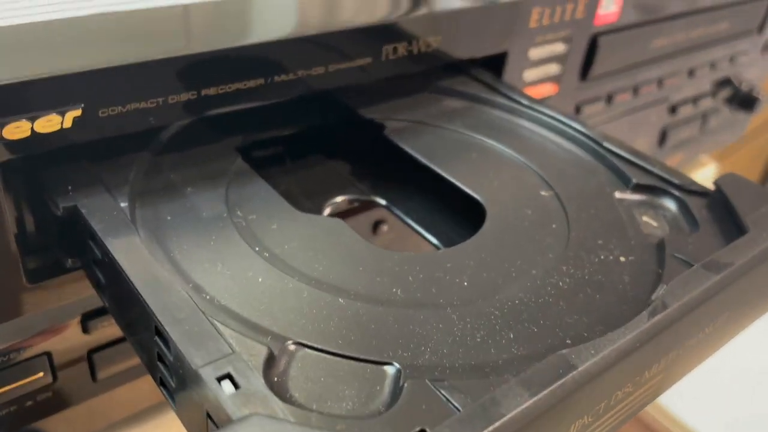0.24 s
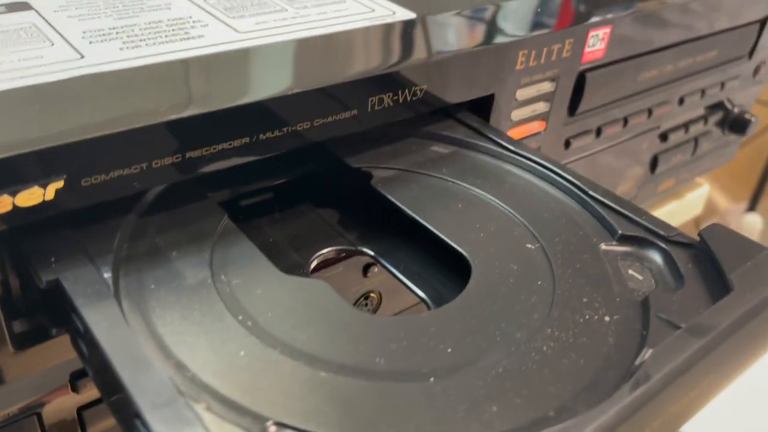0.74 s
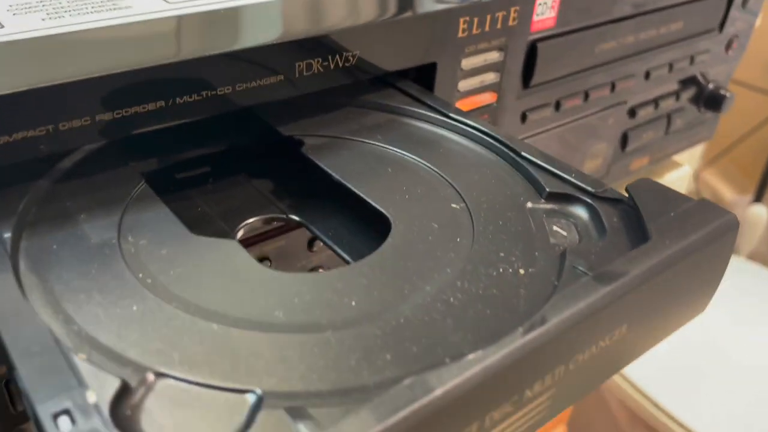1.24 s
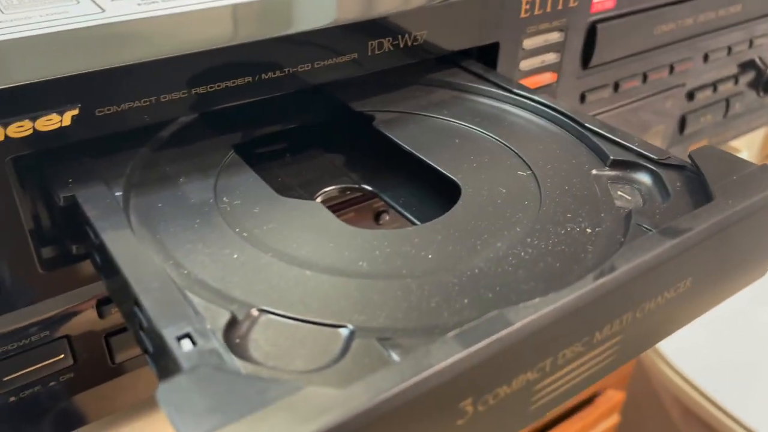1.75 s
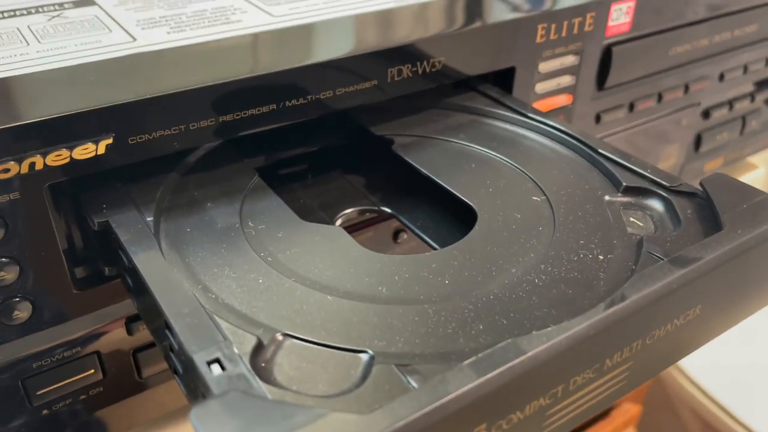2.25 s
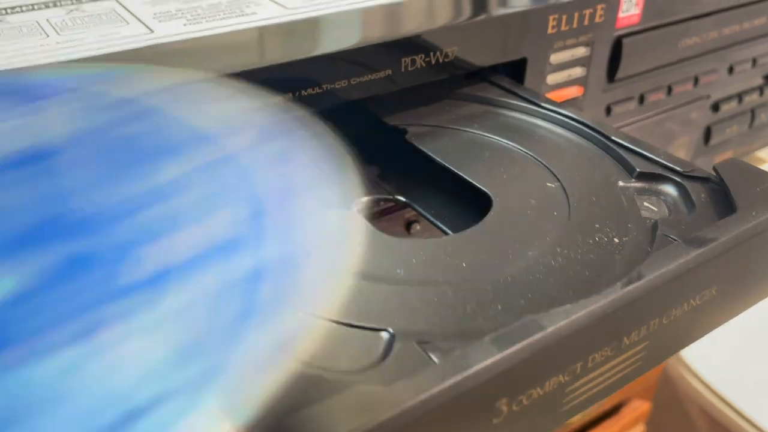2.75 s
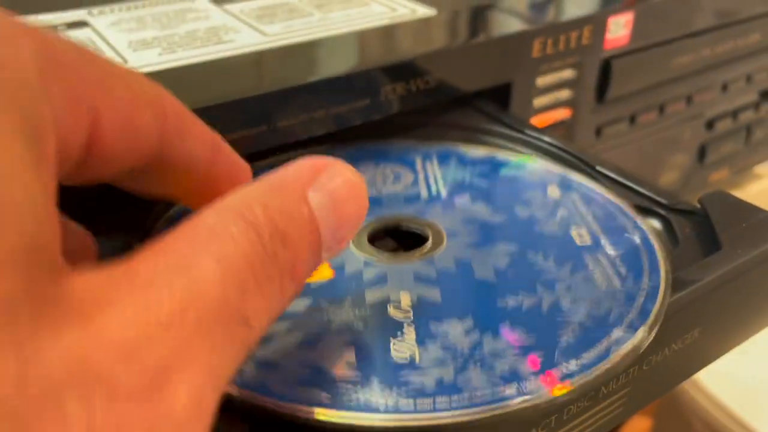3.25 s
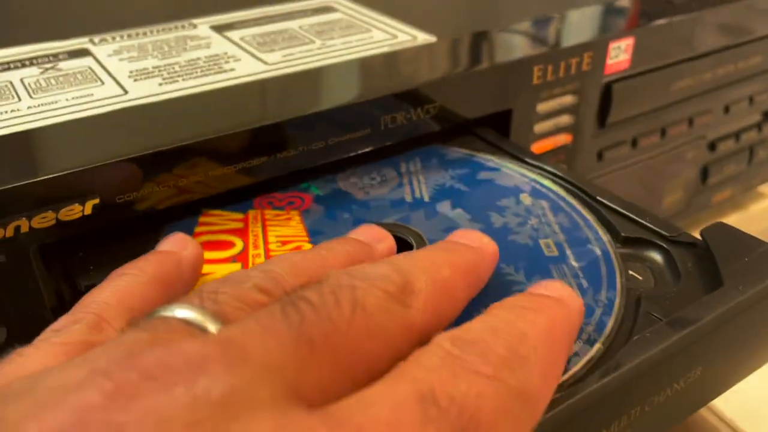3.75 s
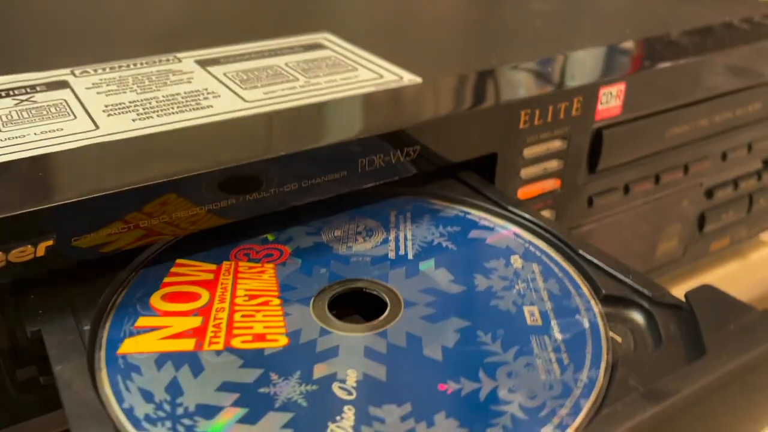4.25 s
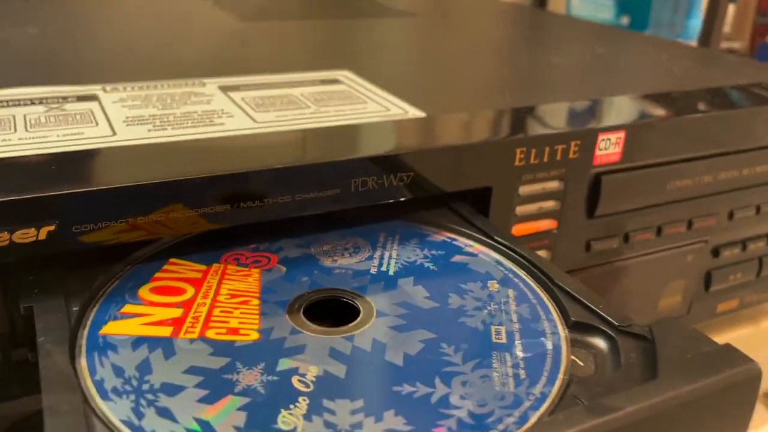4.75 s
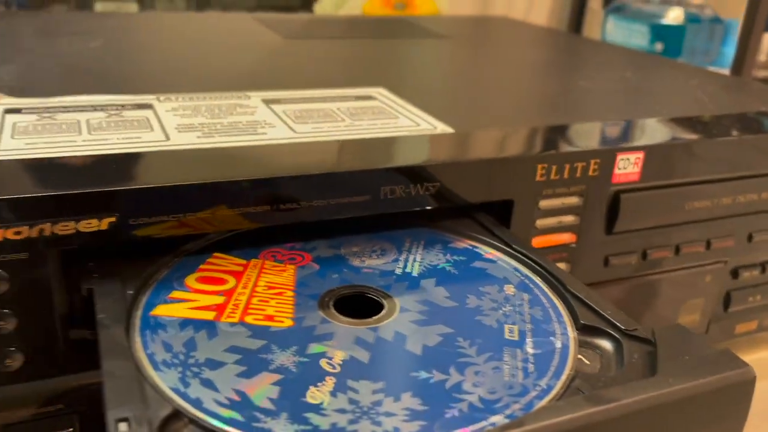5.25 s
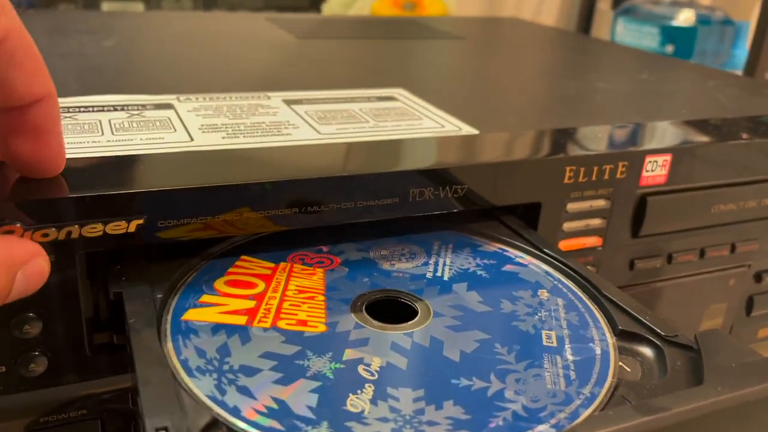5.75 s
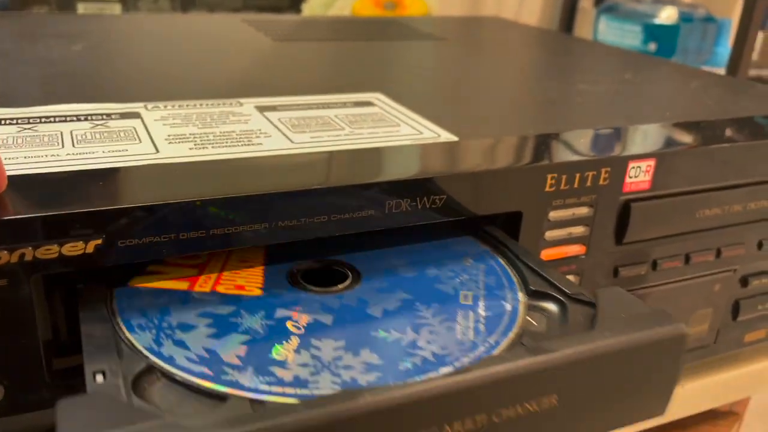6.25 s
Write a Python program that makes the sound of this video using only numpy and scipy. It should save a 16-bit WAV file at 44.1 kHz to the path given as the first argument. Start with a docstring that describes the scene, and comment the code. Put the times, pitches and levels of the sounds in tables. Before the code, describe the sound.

A low ventilation hum fills a small room throughout. In the first half second, hands rustle softly with a few light ticks, and another faint rub comes just after 1 second. At about 3 seconds a plastic disc lands in a disc changer's open tray with a sharp clack. It slides and knocks into its seat until about 4 seconds, a quick, irregular run of close plastic clicks and scrapes with soft low thuds from the cabinet, the loudest part. At 5 seconds come a few sharp, closely spaced taps on the housing, each dropping quickly in pitch, then a light rub and a dull bump around 5.4 seconds. A button clicks near 5.9 seconds, and the motor immediately starts rolling the tray in, with a quiet whir and ticking gears until the end at about 6.5 seconds.

```python
"""A disc changer is loaded over the low hum of a small room. First, hands rustle and tick by friction and
light impact. Near 3 s a plastic disc is laid in the open tray and knocks and slides into its seat, exciting
the resonances of disc, tray and cabinet. At 5 s come sharp taps on the recorder's housing, each falling
quickly in pitch. A finger clicks the button, and from 5.9 s the motor starts to roll the tray in on its
toothed rack, the gears ticking."""
import sys
import numpy as np
from scipy import signal
from scipy.fft import rfft, irfft, next_fast_len
from scipy.io import wavfile
from scipy.ndimage import uniform_filter1d, map_coordinates

SR = 44100
rng = np.random.default_rng(int(sys.argv[2]) if len(sys.argv) > 2 else 0)


def store_wav(level_fs):
    """Save 16-bit WAV to argv[1]."""
    pcm = np.round(np.clip(np.atleast_2d(level_fs), -1, 1) * 32767)
    wavfile.write(sys.argv[1], SR, pcm.T.astype(np.int16))


N = 286650

# Ventilation noise. Each row: frequency in Hz, relative density in dB.
AIR_SPECTRUM = [(12, -63), (25, -30.5), (58, 2.5), (95, -3), (140, -10.5), (222, -14.5), (319, -17),
                (410, -16), (620, -16), (1260, -27), (2320, -31.5), (2800, -40.5), (3400, -45), (6000, -57),
                (10000, -63), (16000, -70.5)]
# Drones in the hum. Each row: centre in Hz, width in Hz, rms level in dB before the drift.
DRONES = [(60.66, 8, -63), (116.54, 4.4, -56), (157.6, 8.9, -67), (253.3, 24, -56.5), (367, 44, -66.5),
          (412, 65, -62.5), (892, 12.33, -71), (1320, 110, -70.5), (2380, 350, -80)]
# Drift of the hum. Each row: time in seconds, gain in dB.
HUM_DRIFT = [(0, 2), (.6, -1), (2.6, -0.5), (3.6, 2), (4.2, 1), (5.8, 1), (6.5, 2)]
# Likeness of left and right in the room. Each row: frequency in Hz, coherence from 0 to 1.
COHERENCE = [(60, 0.9), (150, 0.92), (400, 0.74), (950, 0.046), (2400, 0.6), (6000, 0.15), (7000, 0.39),
             (15000, 0.81)]
# Room decay. Each row: frequency in Hz, reverberation time in seconds.
ROOM_T60 = [(200, 0.56), (1500, 0.15), (5000, 0.11), (12000, 0.0395)]
# Strokes of skin and cloth. Each row: start in seconds, hiss and dull levels in dB, rise and hold in seconds.
RUBS = [(0.024, -73.5, -64, .006, 0.068), (0.143, -60, -70, 0.0076, 0.071),
        (0.234, -50.5, -52.5, .006, 0.073), (0.411, -61.5, -62, 0.0071, 0.025),
        (1.172, -63.5, -59, 0.0034, 0.016), (1.923, -79.5, -74, .006, 0.028),
        (4.619, -66.5, -67, .004, 0.0084), (4.652, -87, -65, 0.0065, 0.079), (5.003, -61, -61, .008, 0.05),
        (5.413, -67, -59, 0.0086, 0.041), (5.589, -57.5, -60, 0.025, 0.035)]
# Friction hiss. Each row: frequency in Hz, relative density in dB.
SKIN_SPECTRUM = [(1000, -39), (2000, 1.5), (3800, -5), (5400, -2.5), (11000, -12), (16000, -14)]
# The hand's weight on the cabinet. Each row: start in seconds, level in dB, pitch in Hz.
THUDS = [(0.153, -40, 81), (2.974, -29, 69.5), (3.314, -31.5, 71), (3.367, -37, 106), (3.547, -33, 94),
         (3.61, -39.5, 60.4), (3.683, -32.5, 81.5), (3.779, -34, 70), (5.432, -34, 67)]
# Taps on the recorder's housing. Each row: start in seconds, level in dB, tick in dB relative to that level.
HOUSING_TAPS = [(5.008, -47, 3.5), (5.014, -40.5, 8.5), (5.0502, -27, -6)]
# Finger and button clicks, and one gear tick as the tray rolls in. Each row: start in seconds,
# snap level in dB, ring pitch in Hz, hollow level in dB, the snap's 60 dB decay time in seconds.
CLICKS = [(0.0326, -73, 2300, -47.5, 0.026), (0.184, -60, 2900, -51, 0.019),
          (0.4201, -63.5, 2370, -49, 0.012), (5.417, -66, 5100, -72, 0.019),
          (5.4298, -55, 5300, -62, 0.019), (5.8504, -37, 4430, -40.5, 0.0097),
          (5.856, -69, 4200, -49.5, 0.11), (5.8932, -52.5, 2290, -41, 0.017),
          (5.9028, -71, 2300, -49.5, 0.03), (6.2228, -74, 2410, -52, .06)]
# A small click. Each row: frequency in Hz, relative density in dB.
CLICK_SPECTRUM = [(900, 4), (1800, -7), (4000, 6), (5800, 1), (9000, 6), (12000, -9), (15600, -21)]
# The high tick of every snap. Each row: centre in Hz, width in Hz, relative gain in dB.
TICK_MODES = [(8900, 2100, -9.5), (12000, 2100, -14), (15600, 600, 2.5)]
# Hiss of the rack. Each row: frequency in Hz, relative density in dB.
RACK_SPECTRUM = [(1000, -19), (2200, -8), (4800, -13), (7000, -19), (10000, -24.5), (16000, -32)]
# Gear teeth that catch. Each row: start in seconds, level in dB.
TOOTH_CATCHES = [(5.992, -52.5), (6.018, -50), (6.122, -49), (6.199, -58), (6.238, -50), (6.344, -46.5),
                 (6.457, -56)]
# Resonances of gear, hollow tray and thin disc. Each row: centre in Hz, width in Hz, relative gain in dB.
GEAR_MODES = [(1390, 910, 2), (2300, 410, 4.5), (3500, 690, -2), (4800, 270, 3.5), (5950, 430, -7)]
TRAY_MODES = [(353.4, 86, -4), (616, 37, 2), (824, 84, -3), (992.5, 83, 1.5), (1101, 50, -1.5),
              (1229.5, 80, 2), (1481, 60, -2.5), (1691, 40, -3.5), (1990, 79, -3)]
DISC_MODES = [(2330, 110, -7), (3100, 383, 7), (3590, 150, -2.5), (4580, 120, -7), (5760, 405, -17),
              (6880, 140, 1.5)]
# Knocks on the tray. Each row: start in seconds, crack level in dB, treble in dB relative to the crack,
# body level in dB, body pitch in Hz, contact time in seconds.
KNOCKS = [(0.316, -75, -5, -44.5, 830, 0.02), (2.9574, -28, 5.5, -30, 997, 0.0015),
          (2.9784, -57, -0.5, -31.5, 846, 0), (2.9969, -47.5, 10, -36, 614, 0),
          (3.015, -56, 3.5, -52, 905, 0.017), (3.032, -43, 1, -42, 810, 0.0023),
          (3.0596, -45, 0, -49, 1060, 0.0054), (3.095, -51.5, -4, -60.5, 1190, 0.0046),
          (3.1315, -42.5, -4.5, -49, 1340, 0.0078), (3.151, -44.5, -3, -46.5, 1350, 0.0057),
          (3.1914, -44, 1.5, -39.5, 629, 0), (3.2283, -45.5, -3.5, -52, 1900, 0.0042),
          (3.2665, -49.5, 2, -55.5, 935, 0.0035), (3.2761, -47.5, -2, -43, 960, 0),
          (3.303, -25.5, 2.5, -31.5, 1105, 0.0083), (3.3248, -47.5, 5, -33.5, 920, 0.021),
          (3.3334, -46.5, 8.5, -46.5, 621, 0.0063), (3.3546, -22.5, 3, -24, 1230, 0.0075),
          (3.3785, -44, 1, -35, 983, 0.026), (3.3965, -26, 3.5, -31.5, 1263, 0.0086),
          (3.4195, -41.5, -1, -44, 958, 0.023), (3.475, -38, -1.5, -40.5, 1340, 0.0011),
          (3.5004, -47, -4, -42.5, 1350, 0), (3.5425, -33, 2, -31.5, 1432, 0),
          (3.5681, -33.5, 7.5, -41, 1360, 0.0067), (3.5791, -35, 3, -29.5, 1235, 0),
          (3.6056, -35, 3, -44.5, 608, 0.0025), (3.6217, -35, 2.5, -38, 930, 0.0083),
          (3.642, -27.5, 8.5, -43, 1270, 0.0088), (3.668, -26, 0.5, -30.5, 976, 0.012),
          (3.688, -23.5, 0.5, -36, 1340, 0.0027), (3.700, -26, 1.5, -34, 826, 0.0048),
          (3.719, -37.5, 4, -46, 1440, 0.00051), (3.75, -35.5, 0.5, -38, 1270, 0.02),
          (3.7627, -25, 1.5, -35.5, 890, 0.013), (3.786, -41, -3, -44, 980, 0),
          (3.8559, -23.5, 5, -32.5, 1360, 0.0041)]
# Hard plastic contact. Each row: frequency in Hz, relative density in dB.
CRACK_SPECTRUM = [(700, -12), (1500, -6.5), (3000, -5.5), (5000, -7), (8000, -9.5), (12000, -17.5),
                  (17000, -10.5)]
# The disc drags over the tray. Each row: time in seconds, level in dB.
SLIDE_LEVEL = [(2.96, -51.5), (3.05, -59), (3.15, -60), (3.29, -61), (3.36, -45), (3.44, -47.5),
               (3.53, -62.5), (3.58, -59.5), (3.64, -51.5), (3.67, -42.5), (3.715, -44.5), (3.74, -56.5),
               (3.78, -52), (3.85, -51.5), (3.87, -49), (3.92, -64), (4.02, -76)]
# Phase between two microphone ports. Each row: frequency in Hz, lead of the left in radians.
LEFT_LEAD = [(20, 0), (900, .4), (1500, 1.1), (1750, -.6), (3000, 1), (4000, .1), (5800, -.2), (6600, -3.1),
             (7900, -3.4), (10400, -6), (12000, -6.7), (14100, -9.4), (16700, -10.4)]
# Balance of the ports. Each row: frequency in Hz, left over right in dB.
LEFT_LEAN = [(60, 2), (350, 1.5), (900, 4.8), (1500, 4), (1900, 1), (3100, 5.5), (5000, 2.5), (6100, 5.5),
             (6700, 0)]
# Roll-off at the top of the band. Each row: frequency in Hz, gain in dB.
ROLL_OFF = [(12000, -0.5), (15600, -13), (16300, -22), (17100, -34)]

AIR_DB, REVERB_DB, TOP_HZ = -51, -7.0, 17100
RUB_T60_S, RUB_T60_PER_HOLD = 0.054, 2.2
THUD_T60_S, TOOTH_T60_S = 0.16, 0.028
DRIVE_START_S, SPIN_UP_S = 5.9, 0.053
RACK_DB, MOTOR_DB, STRAIN_DB, STRAIN_S = -62.5, -57.5, 7, 0.14  # the motor labours at first
KNOCK_RISE_S, RISE_PER_HOLD = 0.00035, 0.16  # a longer contact builds up more slowly
CRACK_T60_S, BODY_T60_S, PUSH_DB = 0.024, 0.066, -22  # the low push is relative to the body level
TREBLE_HZ, TREBLE_T60_S = 3420, 0.05  # above this corner a crack has its own level and dies sooner
DETUNE, SCATTER_DB = 0.018, 2.5  # the loose disc shifts the tray's modes from blow to blow
SPOT_WIDTH_HZ, SPOT_DB = 110, 7.5  # the struck spot rings too


def amp(db):
    """Decibels to amplitude ratio."""
    return 10 ** (np.asarray(db) / 20)


def along(points, hz):
    """Interpolation of (Hz, value) points on a logarithmic frequency axis."""
    freqs, values = np.transpose(points)
    return np.interp(np.log(hz + 1), np.log(freqs + 1), values)


def envelope(rows):
    """Gain per sample from (seconds, dB) rows, silent outside them."""
    times, db = np.transpose(rows)
    return amp(np.interp(np.arange(N) / SR, times, db, -150, -150))


def wobble(rate):
    """Smooth random modulation: a spline through rate knots a second."""
    knots = rng.standard_normal(int(N * rate / SR) + 4)
    return map_coordinates(knots, [np.arange(N) * rate / SR])


def filtered(x, response):
    """Linear filtering: the spectrum is multiplied by a frequency response."""
    n = x.shape[-1]
    size = 2 * next_fast_len(n // 2 + 4096)
    return irfft(rfft(x, size) * response(np.fft.rfftfreq(size, 1 / SR)), size)[..., :n]


def unit_power(response):
    """The response scaled so that white noise keeps its power."""
    return lambda hz: response(hz) / np.sqrt(np.mean(abs(response(hz)) ** 2))


def causal(points):
    """A minimum-phase response: nothing sounds before the blow."""
    def response(hz):
        cepstrum = irfft(np.log(amp(along(points, hz)) + 1e-6))
        cepstrum[1:len(hz)] *= 2
        cepstrum[len(hz):] = 0
        return np.exp(rfft(cepstrum))
    return unit_power(response)


def modes(table):
    """Superposition of damped resonances (Hz, width in Hz, dB), successive ones in opposite phase."""
    def response(hz):
        return sum((-1) ** k * amp(db) * 1j * hz * width / (centre ** 2 - hz ** 2 + 1j * hz * width)
                   for k, (centre, width, db) in enumerate(table))
    return unit_power(response)


def add(track, start, piece):
    """Superpose a piece on the track at start seconds."""
    span = track[..., round(start * SR):round(start * SR) + piece.shape[-1]]
    span += piece[..., :span.shape[-1]]


def burst(rise, hold, t60, spiky):
    """A rough contact is a cluster of tiny impacts that swells, lasts and decays exponentially."""
    t = np.arange(SR // 3) / SR
    attack = (1 - np.exp(-t / max(rise, 1e-4))) ** 2
    shape = attack * amp(-60 * np.clip(t - hold, 0, None) / max(t60, .004))
    chatter = rng.standard_normal(len(t))
    chatter *= amp(spiky * uniform_filter1d(rng.standard_normal(len(t)), size=40))
    return chatter * shape / shape.max() * np.linalg.norm(shape) / np.linalg.norm(chatter * shape)


def room_hum():
    """Ventilation noise and narrow drones add in power; high coherence makes the bass nearly mono."""
    def colour(hz):
        air = amp(along(AIR_SPECTRUM, hz))
        power = amp(AIR_DB) ** 2 * air ** 2 / np.mean(air ** 2)
        for centre, width, db in DRONES:
            peak = 1 / (1 + (2 * (hz - centre) / width) ** 2) ** 2
            power += amp(db) ** 2 * peak / peak.mean()
        angle = np.arccos(np.clip(along(COHERENCE, hz), 0, 1)) / 2
        return np.sqrt(power) * np.array([np.cos(angle), np.sin(angle)])
    mid, side = filtered(rng.standard_normal((2, N)), colour)
    drift = envelope(HUM_DRIFT) * amp(1.34 * wobble(2.1))
    return drift * np.array([mid + side, mid - side])


def reverberation(x, step=SR // 4, delay=200):
    """A diffuse field decays at its own rate at each frequency; every block gets a fresh noise tail."""
    out = np.zeros((2, N + SR))
    for start in range(0, N, step):
        hz, t, field = signal.stft(rng.standard_normal((2, SR // 2)), SR, nperseg=256)
        shared = np.clip(along(COHERENCE, hz), 0, 1)[:, None]
        field[1] = shared * field[0] + np.sqrt(1 - shared ** 2) * field[1]
        decay = amp(-60 * t / along(ROOM_T60, hz)[:, None])
        tail = signal.istft(field * decay, SR, nperseg=256)[1]
        wet = signal.fftconvolve(x[None, start:start + step], tail / np.linalg.norm(tail[0]), axes=1)
        out[:, start + delay:start + delay + wet.shape[1]] += wet
    return out[:, :N]


def hand_rubbing():
    """Friction of skin and cloth gives a grainy hiss and a duller part that peaks below 1 kHz."""
    hiss, dull = np.zeros((2, N))
    for start, hiss_db, dull_db, rise, hold in RUBS:
        t60 = RUB_T60_S + RUB_T60_PER_HOLD * hold
        add(hiss, start, amp(hiss_db) * burst(rise, hold, t60, spiky=11.0))
        add(dull, start, amp(dull_db) * burst(rise, hold, t60, spiky=4.2))
    return filtered(hiss, causal(SKIN_SPECTRUM)) + filtered(dull, modes([(820, 450, 0), (1600, 900, -4)]))


def cabinet_thuds():
    """Jolted by the hand, the cabinet swings as a low damped oscillator."""
    out, t = np.zeros(N), np.arange(SR // 3) / SR
    attack = 1 - np.exp(-t / 0.0025)
    for start, db, hz in THUDS:
        add(out, start, amp(db - 60 * t / THUD_T60_S) * attack * np.sin(2 * np.pi * hz * t))
    return out


def housing_taps():
    """Bending waves in the recorder's housing disperse: highs arrive first, so each tap falls in pitch."""
    out, t = np.zeros(N), np.arange(SR // 20) / SR
    cycles = np.log2(1 + t / 0.00067)  # each twice as long as the last
    wave = np.cos(2 * np.pi * cycles) / (1 + t / 0.0035) * amp(-60 * t / 0.15)
    for start, db, tick_db in HOUSING_TAPS:
        tick = amp(tick_db - 60 * t / 0.001) * rng.standard_normal(len(t))
        add(out, start, amp(db) * (wave + tick))
    return out


def small_clicks():
    """Brief impacts of finger, button and one gear tooth excite small parts and the hollow cabinet."""
    snaps, hollow, ring = np.zeros((3, N))
    for start, db, ring_hz, hollow_db, t60 in CLICKS:
        snap = amp(db) * burst(0.0008, 0, t60, spiky=5.3)
        add(snaps, start, snap)
        add(ring, start, amp(5.0) * filtered(snap, modes([(ring_hz, 1600, 0), *TICK_MODES])))
        add(hollow, start, amp(hollow_db) * burst(0.00022, 0, 2.36 * t60, spiky=6.0))
    cabinet = modes([(517, 270, 2.4), (1130, 570, 3.1), (2470, 1050, 1.1)])
    return filtered(snaps, causal(CLICK_SPECTRUM)) + ring + filtered(hollow, cabinet)


def tray_drive():
    """Forced vibration: the motor murmurs in the hollow tray, the rack hisses, catching teeth ring."""
    t = np.clip(np.arange(N) / SR - DRIVE_START_S, 0, None)
    spin_up = (1 - np.exp(-t / SPIN_UP_S)) ** 2
    rack = amp(RACK_DB + 2.3 * wobble(70)) * filtered(rng.standard_normal(N), causal(RACK_SPECTRUM))
    motor_gain = amp(MOTOR_DB + STRAIN_DB * np.exp(-t / STRAIN_S) + 2.3 * wobble(30))
    hollow = modes([(630, 73, 2.5), (910, 130, 0.0), (1420, 350, -2), (1488, 15, 8.5)])
    murmur = filtered(rng.standard_normal(N), hollow)
    catches = np.zeros(N)
    for start, db in TOOTH_CATCHES:
        add(catches, start, amp(db) * burst(0.00041, 0.0019, TOOTH_T60_S, spiky=12.0))
    return spin_up * (rack + motor_gain * murmur) + filtered(catches, modes(GEAR_MODES))


def struck_tray(spot_hz):
    """The point of impact weights the modes: those near the spot's pitch respond most."""
    struck = [(spot_hz, SPOT_WIDTH_HZ, SPOT_DB)]
    for hz, width, db in TRAY_MODES:
        shifted_hz = hz * (1 + DETUNE * rng.normal())
        octaves_away = abs(np.log2(hz / spot_hz))
        struck.append((shifted_hz, width, db - 6 * octaves_away + rng.normal(0, SCATTER_DB)))
    return modes(sorted(struck))


def disc_seating():
    """Impact and sliding friction excite the modes of disc and tray; each knock also pushes the cabinet."""
    contact, treble, body, push = np.zeros((4, N))
    for start, db, treble_db, body_db, body_hz, hold in KNOCKS:
        rise = KNOCK_RISE_S + RISE_PER_HOLD * hold
        crack = amp(db) * burst(rise, hold, CRACK_T60_S, spiky=17)
        add(contact, start, crack)
        since_release = np.clip(np.arange(len(crack)) / SR - hold, 0, None)
        add(treble, start, (amp(treble_db - 60 * since_release / TREBLE_T60_S) - 1) * crack)
        tray = struck_tray(body_hz)
        add(body, start, amp(body_db) * filtered(burst(rise, hold, BODY_T60_S, spiky=7.1), tray))
        add(push, start, amp(body_db + PUSH_DB) * rng.choice([-1, 1]) * np.hanning(SR // 600))
    disc_drag, tray_drag = envelope(SLIDE_LEVEL) * amp(4.9 * wobble(120)) * rng.standard_normal((2, N))
    contact += disc_drag + filtered(treble, lambda hz: (1j * hz / (TREBLE_HZ + 1j * hz)) ** 3)  # high-pass
    body += amp(3.5) * filtered(tray_drag, modes(TRAY_MODES))
    cracks = filtered(contact, causal(CRACK_SPECTRUM))
    ring = amp(-4.0) * filtered(contact, modes(DISC_MODES))
    cabinet = filtered(push, modes([(165.0, 72, -1.5), (325, 150, -1)]))
    return cracks + ring + body + cabinet


def scene():
    """Superposition of the close sounds and their reverberation with the hum and the dry taps and thuds."""
    near = disc_seating() + small_clicks() + hand_rubbing() + tray_drive()
    return near + amp(REVERB_DB) * reverberation(near) + room_hum() + housing_taps() + cabinet_thuds()


def record(dry):
    """Two band-limited ports receive the sound with a phase and balance that depend on frequency."""
    def ports(hz):
        lean_db = np.outer([.5, -.5], along(LEFT_LEAN, hz))
        phase = np.outer([.5, -.5], along(LEFT_LEAD, hz))
        return amp(along(ROLL_OFF, hz) + lean_db) * np.exp(1j * phase) * (hz < TOP_HZ)
    return filtered(dry, ports)


dry = scene()
out = record(dry)
store_wav(out)
```